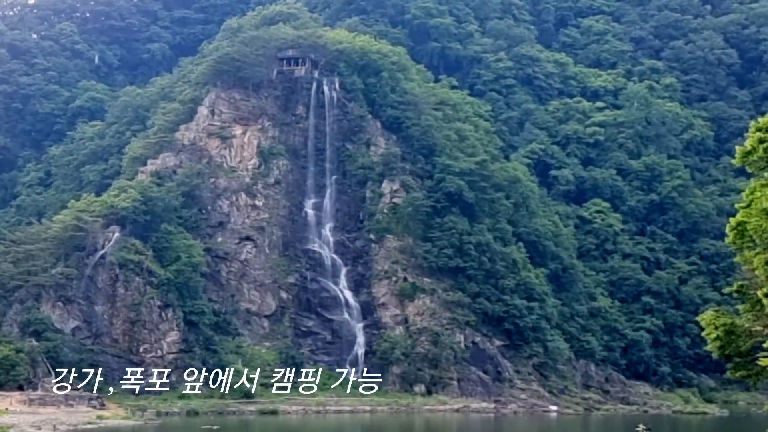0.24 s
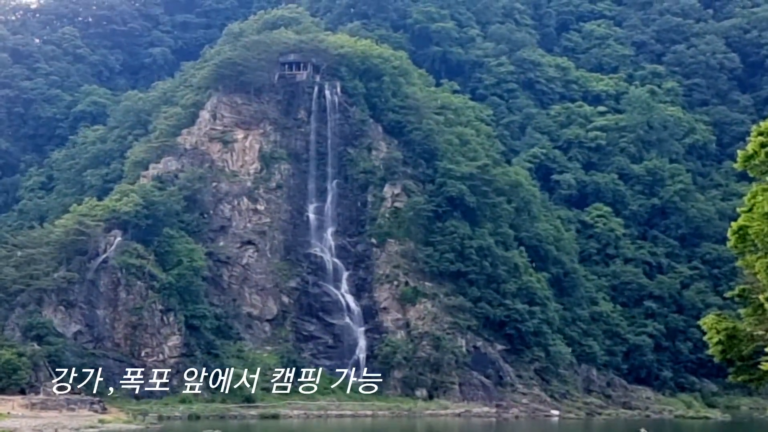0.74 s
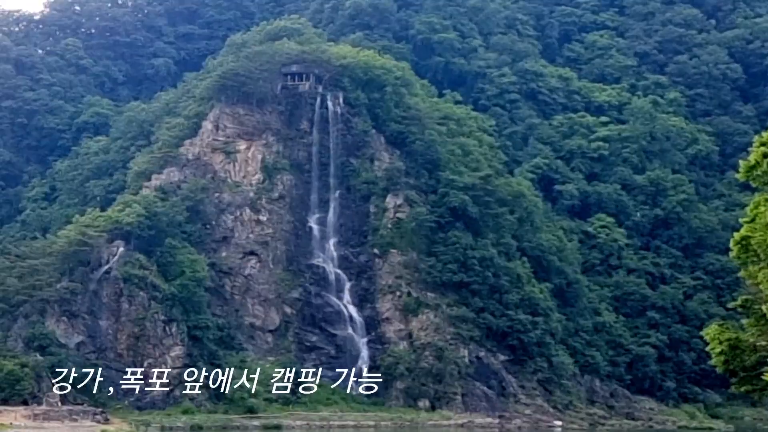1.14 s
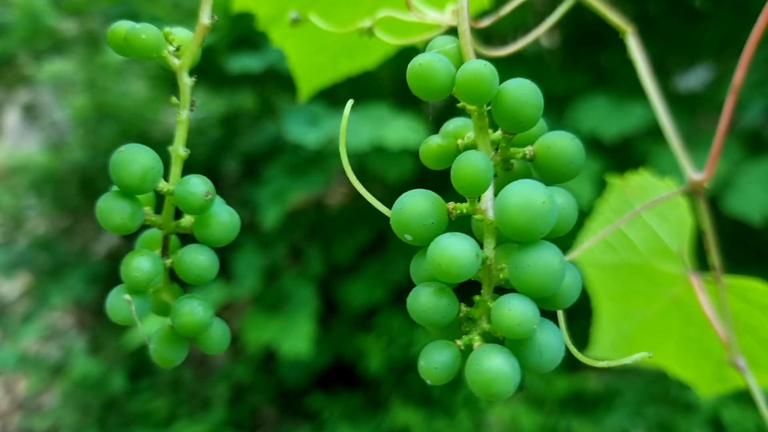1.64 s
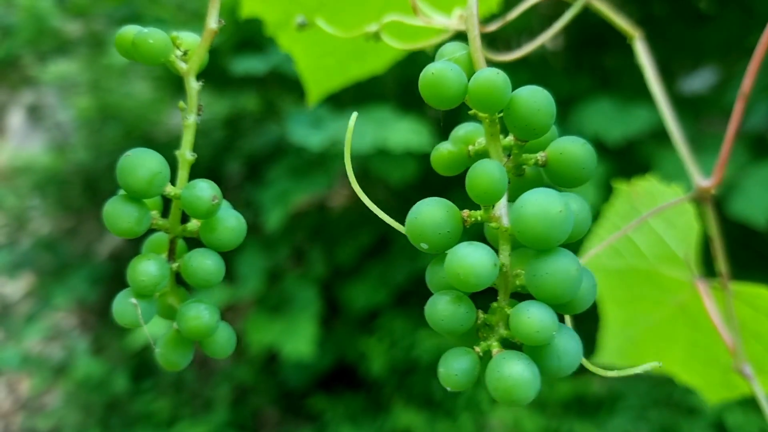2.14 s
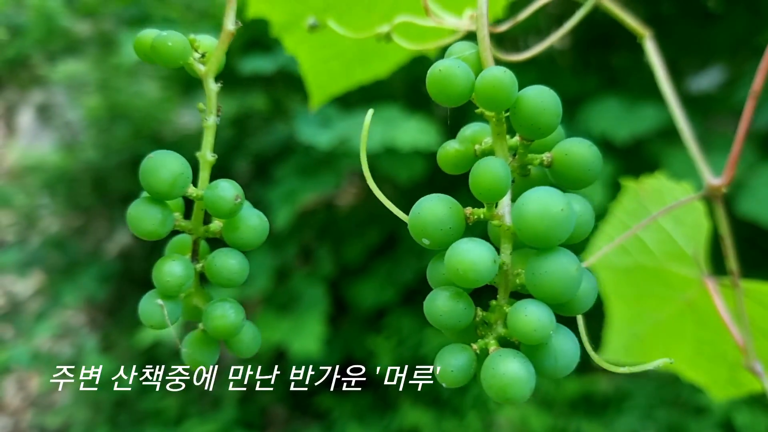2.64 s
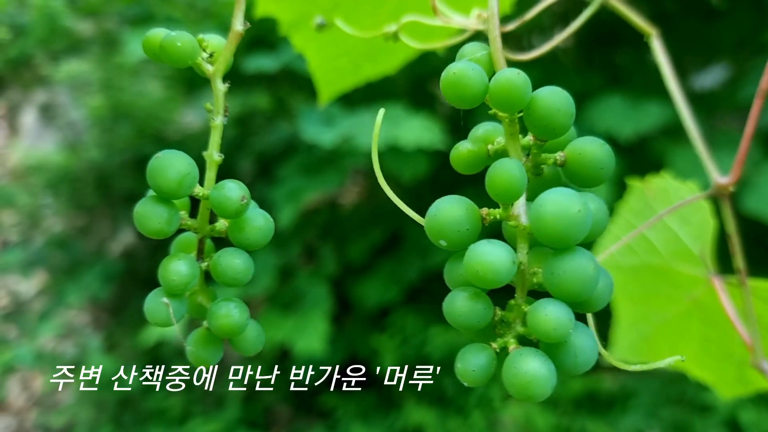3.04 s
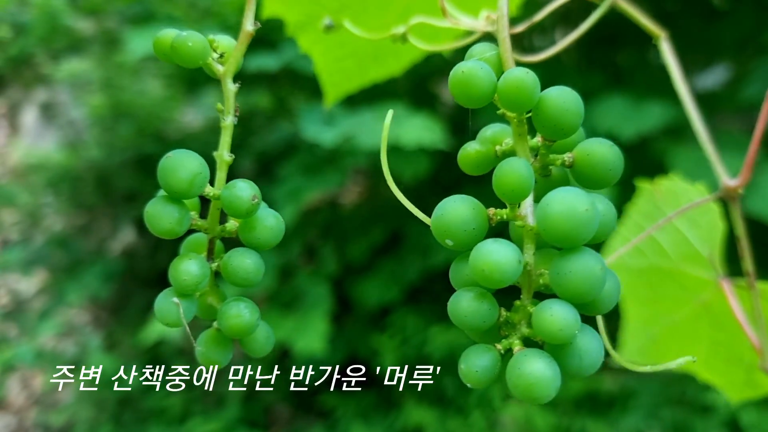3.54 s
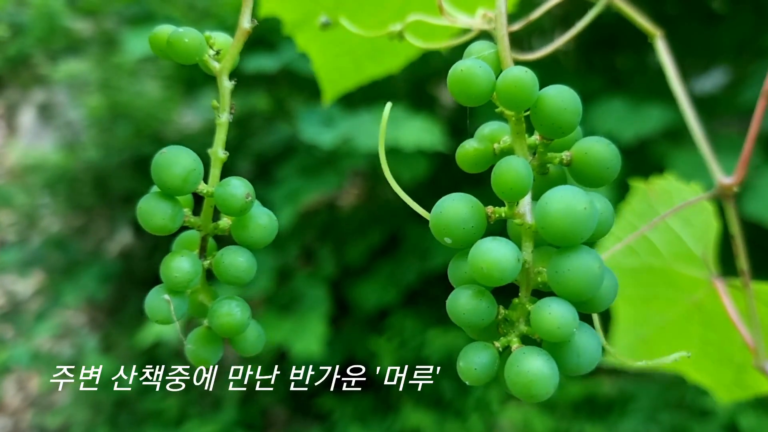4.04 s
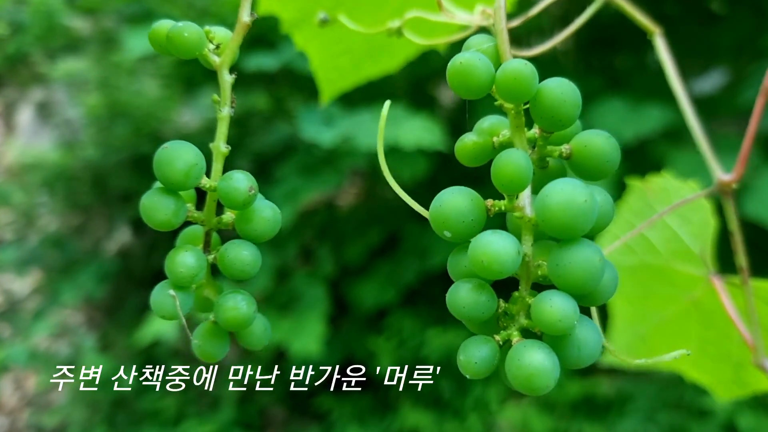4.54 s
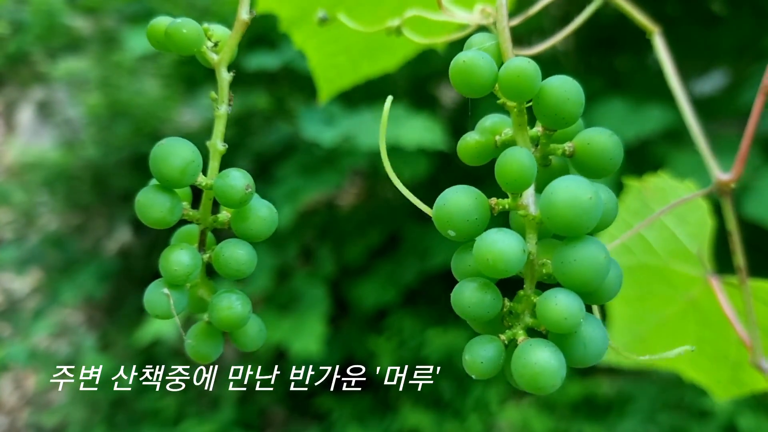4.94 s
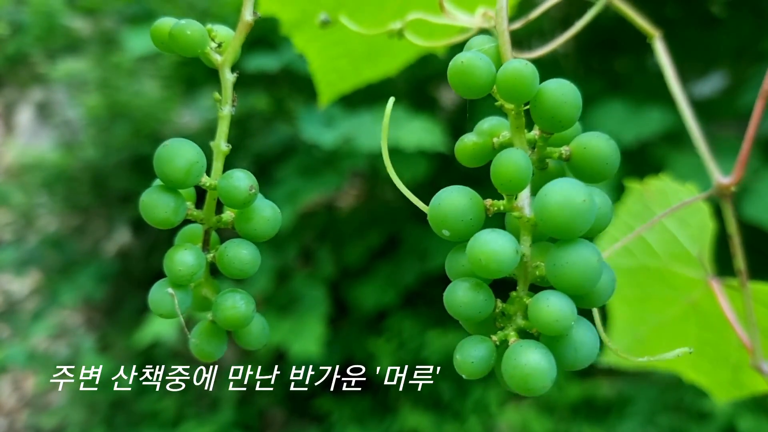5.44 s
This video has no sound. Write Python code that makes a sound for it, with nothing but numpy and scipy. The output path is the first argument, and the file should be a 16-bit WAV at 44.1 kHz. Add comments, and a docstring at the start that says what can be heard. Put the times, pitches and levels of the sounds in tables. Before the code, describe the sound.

From 0 to 1.45 s a distant waterfall rushes as a wide, dense, steady hiss and roar, with deep booms surging around 0.4 and 0.9 s. It stops abruptly, leaving about 0.03 s of near-silence. A quiet wood then opens with a fading blur of birdsong and faint far whistles. From 1.76 to 2.7 s a near songbird, right of centre, sings five fast phrases of arching, dipping, upward-flicking and falling whistles, with short added notes near 2.45 s. A low wind gust peaks at 2.7 s. A very faint falling-chip trill comes around 2.9-3.25 s, then sparse thin whistles, clearer around 4.1-4.3 s. Three nasal, slightly hoarse calls sound at 4.95-5.25 s. The near bird returns at 5.3-5.7 s. A soft, high insect rasp, tiny knocks, low air noise and short smeared tree echoes persist beneath.

```python
"""A near songbird, right of centre, repeats a four-part phrase of bending whistles in a quiet wood.
Before it a distant waterfall rushes (banded noise and pool booms) until a cut and a short near-silence.
A tit gives nasal two-voice calls, far birds whistle in short glides and trill in falling chips.
An insect chorus rasps near 4.4 kHz as narrow noise; small knocks ring and wind gusts reach the microphone.
The trees scatter every bird note into early echoes and a short, smeared noise tail."""
import sys
import numpy as np
from scipy import signal
from scipy.fft import rfft, irfft, next_fast_len
from scipy.io import wavfile
from scipy.ndimage import uniform_filter1d, map_coordinates

SR = 44100
rng = np.random.default_rng(int(sys.argv[2]) if len(sys.argv) > 2 else 0)


def file_out(sig):
    """Save sig as 16-bit WAV at sys.argv[1]."""
    # one column per channel
    cols = np.atleast_2d(sig).T
    # limit, then scale
    lim = np.clip(cols, -1, 1)
    pcm = np.round(lim * 32767).astype(np.int16)
    wavfile.write(sys.argv[1], SR, pcm)


N = 250488
T = np.arange(N) / SR

# the falls stop at the cut, stay faintly audible, and the wood opens
CUT_S, WOOD_S, SILENCE_DB = 1.4545, 1.4865, -38
CUTOFF_HZ = 15900  # where the top of the microphone channel is fully cut

# Far noise of the wood: traffic, leaves and microphone hiss (pitch_hz, relative_level_db per Hz)
AIR_SPECTRUM = [(18, -28.5), (30, -7), (80, -5), (130, -13), (200, -5), (340, -5), (420, -14), (900, -15.5),
                (1350, -24.5), (3200, -25.5), (5900, -28.5), (7600, -31.5), (9500, -41.5), (15500, -37)]
# Left-right likeness of that noise (pitch_hz, likeness -1 to 1)
AIR_LIKENESS = [(60, .77), (130, .53), (290, .23), (640, -.37), (1410, -.4), (3100, -.15), (6820, -.05),
                (15000, 0)]
# Its balance (pitch_hz, left_minus_right_db)
AIR_BALANCE = [(60, 3), (200, 1.5), (700, -.4), (2380, -2.5), (4400, -4), (8120, -.6)]
AIR_DB = -66.5
# Gusts of wind on the microphone (peak_s, level_db)
GUSTS = [(1.55, -68.5), (2.03, -70), (2.7, -61.5), (3.8, -70), (4.59, -74), (4.98, -78.5), (5.36, -87)]
GUST_RISE_DB_PER_S, GUST_FALL_DB_PER_S = 32.5, 44

# Insect chorus, joined up between rows (time_s, centre_hz, level_db)
INSECT_CHORUS = [(1.49, 4270, -61), (2.85, 4280, -67.5), (3.25, 4396, -69), (3.5, 4560, -70.5),
                 (3.75, 4340, -73), (4.15, 4640, -67), (4.42, 4210, -72), (4.6, 4170, -67),
                 (4.85, 4340, -70.5), (5.68, 4370, -67)]
# Small knocks in the undergrowth (start_s, pitch_hz, level_db, t60_s)
KNOCKS = [(2.384, 1780, -57, 0.007), (3.30, 491, -63.5, 0.12), (4.595, 1086, -66, .05),
          (4.852, 1360, -62, 0.023), (5.07, 468, -62.5, 0.19), (5.515, 300, -53.5, 0.084)]

# Distant rushing water (pitch_hz, relative_level_db per Hz)
FALLS_SPECTRUM = [(18, -31), (30, -57), (66, 3.5), (90, -4), (152, -14.5), (369, -9.5), (505, -19.5),
                  (808, -8), (1640, -18), (2420, -9), (2760, -11), (4090, -9.5), (7080, -18.5),
                  (11300, -37), (15500, -38.5)]
# Left-right likeness of the water (pitch_hz, likeness -1 to 1)
FALLS_LIKENESS = [(30, .4), (60, .58), (130, .87), (290, .85), (520, .72), (860, .85), (1400, .1),
                  (2300, .62), (2950, .15), (4200, .6), (5800, .5), (7300, .1), (9500, .48), (13000, .1)]
# Its balance (pitch_hz, left_minus_right_db)
FALLS_BALANCE = [(30, -2.5), (130, 0), (3000, 0), (4050, -6.5), (5300, -.5), (7100, 2), (8600, -4.5),
                 (10500, -1.2)]
RUSH_DB = -39
# Plunge-pool booms (pitch_hz, width_hz, relative_level_db)
POOL_BOOMS = [(52.7, 15.5, 1), (80.7, 23, -3), (97, 9.8, -8)]
# Surges of the pool, slow to build and fast to drop (peak_s, level_db)
SURGES = [(0.39, -45), (0.93, -43), (1.21, -55), (1.43, -50.5)]
SURGE_RISE_DB_PER_S, SURGE_FALL_DB_PER_S = 48, 132

# Resonances of the scattered song (pitch_hz, width_hz, relative_level_db)
BLUR_BANDS = [(4750, 500, 0), (6300, 1200, -10), (3500, 500, -18)]
BLUR_DB, BLUR_SAG_DB_PER_S = -46, 33  # level before the band filter, and its sag as the wood opens
BLUR_END_S, BLUR_FADE_DB_PER_S = 1.598, 145  # from here this fade adds to the sag
TREES_T60_S, TREES_DB, ECHO_DB = .55, -8.5, -5

# A far trill of quick falling chips; each gap is longer than the last by GAP_GROWS_S
TRILL_S, CHIP_GAP_S, GAP_GROWS_S, CHIPS = 2.896, .0232, .00036, 14
CHIP_HZ, CHIP_END_HZ, CHIP_S = 4750, 3950, .013
CHIP_DB, CHIP_SWELL_DB, CHIP_SCATTER_DB = -75, 1.05, 3  # first chip, rise per chip, random spread

# Far whistles (start_s, end_s, start_hz, end_hz, level_db, share hidden by leaves 0-1)
FAR_WHISTLES = [(1.55, 1.63, 2247, 2230, -66, .3), (1.604, 1.635, 3780, 3400, -59, .3),
                (1.615, 1.649, 2585, 2600, -64, .7), (1.668, 1.70, 2672, 2860, -60, .4),
                (1.70, 1.745, 3800, 4150, -55, .25), (1.742, 1.762, 4300, 4750, -56, .3),
                (1.80, 1.917, 2680, 1970, -62, .85), (2.09, 2.13, 2670, 2400, -61, .8),
                (2.13, 2.274, 2600, 1963, -61, .85), (2.785, 2.86, 7600, 8000, -78, .4),
                (2.955, 3.042, 7050, 7850, -78, .4), (3.14, 3.245, 6900, 7800, -78, .4),
                (3.227, 3.262, 4730, 5000, -71, .6), (3.335, 3.43, 6900, 7700, -79, .4),
                (3.41, 3.46, 4500, 5270, -76, .8), (3.548, 3.615, 4700, 5400, -76, .8),
                (4.088, 4.13, 8580, 8170, -64, .5), (4.112, 4.153, 5270, 5160, -72, .8),
                (4.12, 4.15, 7900, 7650, -57, .35), (4.158, 4.182, 6700, 6000, -54, .3),
                (4.235, 4.276, 7050, 7420, -65, .6), (4.257, 4.284, 6700, 3700, -54, .1),
                (4.282, 4.335, 2260, 2200, -69, .15), (4.445, 4.50, 7300, 7800, -78, .5),
                (4.505, 4.55, 3600, 4050, -65, .4), (4.61, 4.655, 7300, 7750, -78, .5),
                (4.658, 4.744, 3420, 3200, -68, .15), (4.742, 4.765, 2990, 2930, -68, .2),
                (4.79, 4.847, 7450, 7750, -78, .5), (4.825, 4.874, 5860, 5930, -74, .5),
                (4.888, 4.963, 2860, 4700, -69, .5), (5.636, 5.664, 3300, 3540, -62, .5)]
FAR_LAG_SPREAD_S = .00004  # far birds sit a little to either side

# Nasal calls, both halves of the voice box at once
# (start_s, hoarse_lead_s, clear_part_s, low_voice_hz, high_voice_hz, glide_pitch_share, level_db)
NASAL_CALLS = [(4.945, 0.0218, 0.027, 2863, 3463, 0.046, -55),
               (5.04, 0.029, 0.068, 3108, 3730, -0.016, -55), (5.166, .048, .082, 3130, 3802, -.025, -55.5)]
# Tones made as the two voices modulate each other (low_voice_multiple, high_voice_multiple)
VOICE_MIXES = [(1, 0), (0, 1), (2, 0), (1, 1), (0, 2), (-1, 3), (3, 0), (2, 1), (1, 2), (4, 0), (3, 1),
               (2, 2), (0, 3), (-1, 2), (3, -1)]
# Level of each of those tones against the call (level_db)
VOICE_MIX_DB = [-4.5, 1.5, 0.5, 0, -4.5, -11.5, -21, -26, -34, -30, -32.5, -34, -41, -25, -6]
LEAD_PITCH_SHARE, CALL_BOW = 1.05, .0113  # starting pitch factor; upward arch as a pitch share
LEAD_DB, CLEAR_EDGE_DB = -19, -7  # against the middle of the clear part
MID_HOARSE, END_HOARSE = .05, .22  # hoarse share 0-1

# One songbird phrase: arch, scoop, upward flick, falling end
# (start_s within phrase, length_s, start_hz, middle_hz, end_hz, relative_level_db, peak_share of length)
# start_s and length_s are stretched by the length factor of each phrase
PHRASE_PARTS = [(.002, .044, 4650, 5050, 4200, 0, .6), (.045, .022, 4050, 3760, 3950, 0, .5),
                (.065, .014, 3950, 4750, 6800, -4, .5), (.082, .024, 3650, 3270, 3080, -5, .4)]
# Each phrase (start_s, level_db, length_factor)
PHRASES = [(1.761, -39, .98), (1.918, -35.5, 0.95), (2.083, -37, 0.94), (2.250, -39.5, .99),
           (2.590, -38, 0.91)]
# Other syllables of the songbird
# (start_s, length_s, start_hz, middle_hz, end_hz, level_db, peak_share of length)
OTHER_SYLLABLES = [(2.427, .032, 3230, 2630, 2600, -57.5, .7), (2.459, 0.018, 2716, 3295, 3390, -36, 1),
                   (2.477, 0.017, 3530, 4000, 5730, -36, 0.19),
                   (2.497, 0.03, 3534, 2955, 2860, -45.5, 0.11),
                   (5.300, 0.03, 6050, 6380, 6890, -42.5, 0.9), (5.332, 0.033, 6840, 5300, 4240, -40, 0.62),
                   (5.430, .028, 3645, 4017, 3610, -32.5, 0.78), (5.459, .025, 3592, 3994, 3940, -35, 0.67),
                   (5.483, 0.048, 3945, 4333, 5310, -36, .8), (5.617, 0.046, 5880, 6380, 6930, -41.5, 1),
                   (5.660, .034, 6883, 5690, 4252, -39, 0.6)]
SINGER_LAG_S, SINGER_PAN_DB = .000372, -2.3  # to the right: left channel later and softer
SYLLABLE_START_DB, SYLLABLE_END_DB = 17, 10  # depth of start and end under the loudest point


def amp(db):
    """Gain of a level in dB."""
    return 10 ** (np.asarray(db) / 20)


def unit(x):
    """Scaled to rms 1."""
    return x / np.sqrt(np.mean(x ** 2) + 1e-20)


def columns(rows, t=T):
    """Each column of a curve table at times t."""
    s, *rest = np.transpose(rows)
    return [np.interp(t, s, c) for c in rest]


def at_hz(points, hz):
    """Spectrum value on a log-frequency axis."""
    f, v = np.transpose(points)
    return np.interp(np.log(hz), np.log(f), v)


def drift(rate, size=N):
    """Random wander with this many turns a second (at most 1500), spread about 1."""
    knots = rng.standard_normal(9000)
    position = 3 + np.arange(size) / SR * min(rate, 1500)
    return map_coordinates(knots, [position], order=1) * np.sqrt(1.5)


def swells(rows, rise_db_per_s, fall_db_per_s):
    """Gain that climbs to each peak and drops from it at steady rates."""
    gain = 0
    for s, db in rows:
        slope = np.where(T < s, rise_db_per_s, fall_db_per_s)
        gain = gain + amp(db - slope * abs(T - s))
    return gain


def resonate(x, hz, width):
    """Two-pole resonance of gain 1."""
    r = np.exp(-np.pi * width / SR)
    feedback = [1, -2 * r * np.cos(2 * np.pi * hz / SR), r * r]
    return signal.lfilter([(1 - r * r) / 2, 0, (r * r - 1) / 2], feedback, x)


def booms(modes):
    """Noise in a few steep resonances, partly separate in each channel."""
    common, own = rng.standard_normal(N), rng.standard_normal((2, N))
    noise, total = common + .72 * own, 0
    for hz, width, db in modes:
        ringing = resonate(resonate(noise, hz, width), hz, width)
        total = total + amp(db) * unit(ringing)
    return unit(total)


def wash(source, spectrum, alike, pan, shared_db, own_db):
    """Colours two unrelated noises into a stereo field whose half-octave bands swell together and alone."""
    size = source.shape[1]
    hz = np.maximum(np.fft.rfftfreq(size, 1 / SR), 1)
    likeness = np.clip(at_hz(alike, hz), -.99, .99)
    mid, side = rfft(source) * amp(at_hz(spectrum, hz)) * np.sqrt([1 + likeness, 1 - likeness])
    pair = np.array([mid + side, mid - side]) * amp(np.outer([.5, -.5], at_hz(pan, hz)))
    band = np.clip(2 * np.log2(hz / 30), 0, 18)
    out, shared = 0, drift(5, size)
    for k in range(19):
        own = drift(9, size) + drift(40, size)
        overlap = np.maximum(0, 1 - abs(band - k))
        out = out + amp(shared_db * shared + own_db * own) * irfft(pair * overlap, size)
    return out / np.sqrt(np.mean(out.mean(axis=0) ** 2))


def add(out, start_s, hz_of, gain_of_t, length_s, lag_s, pan_db):
    """Adds a gliding sine with soft ends to both channels, the left one late by lag_s."""
    first = int(start_s * SR) - 40
    t = np.arange(first, min(first + int(length_s * SR) + 80, N)) / SR
    turns = np.cumsum(hz_of(t)) / SR + rng.random()
    for side, sign in enumerate([.5, -.5]):
        late = t - sign * lag_s
        ends = np.clip(np.minimum(late - start_s, start_s + length_s - late) / .002, 0, 1)
        wave = np.sin(2 * np.pi * np.interp(late, t, turns))
        gain = np.sqrt(2) * amp(sign * pan_db) * gain_of_t(late)  # root 2 makes the level an rms
        out[side, first:first + len(t)] += gain * ends * wave


def roughen(x, share, rate):
    """Swaps a share of a tone's steady strength for signed flutter, which smears its line."""
    share = np.clip(share, 0, 1)
    return x * (np.sqrt(1 - share) + np.sqrt(share) * drift(rate))


def air():
    """Far noise of the wood as a wide wash, with low lumps of wind as resonant noise."""
    noise = rng.standard_normal((2, next_fast_len(N)))
    still = wash(noise, AIR_SPECTRUM, AIR_LIKENESS, AIR_BALANCE, shared_db=.3, own_db=.6)[:, :N]
    gusts = swells(GUSTS, GUST_RISE_DB_PER_S, GUST_FALL_DB_PER_S)
    wind = gusts * booms([(65, 49, 0)])
    return amp(AIR_DB) * still + wind * amp([[1.5], [-1.5]])


def trees(x):
    """Near branches give early echoes; moving leaves smear the dense dying tail of the wood."""
    t = T[:int(.6 * SR)]
    shape = (2, len(t))
    tail = rng.standard_normal(shape) * amp(-60 * t / TREES_T60_S) * np.clip(t / .028, 0, 1)
    strengths = rng.standard_normal(shape)
    sparse = rng.random(shape) < 1500 / SR  # about 1500 echoes a second
    early = strengths * sparse * np.exp(-t / .022) * (t > .001)
    out = 0
    for sent, reply, db in [(x, early, ECHO_DB), (roughen(x, .9, 800), tail, TREES_DB)]:
        reply = unit(reply) / np.sqrt(len(t))
        out = out + amp(db) * signal.fftconvolve(sent, reply, axes=1)[:, :N]
    return out


def waterfall():
    """Dense splashes merge into a distant rush, over resonant pool booms that surge."""
    size = next_fast_len(int(1.5 * SR))
    splashes = rng.standard_normal((2, size)) * amp(.46 * drift(250, size))
    rush = np.zeros((2, N))
    rush[:, :size] = wash(splashes, FALLS_SPECTRUM, FALLS_LIKENESS, FALLS_BALANCE,
                          shared_db=0, own_db=.68)
    surges = swells(SURGES, SURGE_RISE_DB_PER_S, SURGE_FALL_DB_PER_S)
    return amp(RUSH_DB) * rush + surges * booms(POOL_BOOMS) * amp([[-1.2], [1.2]])


def insects():
    """Slow noise carried on a wandering centre pitch makes a narrow grainy rasp."""
    hz, db = columns(INSECT_CHORUS)
    lowpass = signal.butter(3, 380, fs=SR, output="sos")
    noise = signal.sosfilt(lowpass, rng.standard_normal((2, 2, N)))
    turn = 2 * np.pi * np.cumsum(hz) / SR
    rasp = unit(noise[0] * np.cos(turn) + noise[1] * np.sin(turn))
    return amp(db + 2.3 * drift(35)) * rasp * amp([[-3], [3]])


def knocks():
    """Each knock sets one mode ringing, a sine that dies away exponentially."""
    out = np.zeros(N)
    for s, hz, db, t60 in KNOCKS:
        t = np.maximum(T - s, 0)
        out += amp(db - 60 * t / t60) * np.sin(2 * np.pi * hz * t)
    return out


def blurred_song():
    """Only the scattered sound of a finished song arrives: rough bands that fade, held to the song's range."""
    band = signal.butter(6, [3000, 7100], "band", fs=SR, output="sos")
    noise = signal.sosfilt(band, booms(BLUR_BANDS))
    sag = BLUR_SAG_DB_PER_S * (T - WOOD_S)
    fade = BLUR_FADE_DB_PER_S * np.maximum(T - BLUR_END_S, 0)
    return amp(BLUR_DB - sag - fade) * noise


def trill():
    """Each chip is a fast falling sine; the gaps lengthen and the chips tend to grow louder."""
    out = np.zeros((2, N))
    for k, chance in enumerate(rng.standard_normal(CHIPS)):
        s = TRILL_S + CHIP_GAP_S * k + GAP_GROWS_S * k * k / 2 - .003
        db = CHIP_DB + CHIP_SWELL_DB * k + CHIP_SCATTER_DB * chance
        add(out, s, lambda t: np.interp(t, [s, s + CHIP_S], [CHIP_HZ, CHIP_END_HZ]),
            lambda t: amp(db), CHIP_S, -.0002, -4)
    return out


def far_birds():
    """Straight glides under an arch; leaves break them up and hide part of the direct sound only."""
    out, hidden = np.zeros((2, N)), np.zeros(N)
    sides = rng.uniform(-1, 1, len(FAR_WHISTLES))
    for (s, end, hz, end_hz, db, share), side in zip(FAR_WHISTLES, sides):
        def arch(t):
            return amp(db) * np.sin(np.pi * np.clip((t - s) / (end - s), 0, 1)) ** .4
        add(out, s, lambda t: np.interp(t, [s, end], [hz, end_hz]), arch,
            end - s, side * FAR_LAG_SPREAD_S, -2.5)
        hidden = np.where((T >= s) & (T < end), share, hidden)
    hidden = uniform_filter1d(hidden, size=200)
    sent = roughen(out, hidden, 450)
    return (1 - hidden) * sent, sent


def tit():
    """Two voices and their mixing tones; each call slides down hoarsely, clears, glides and frays."""
    out, hoarse = np.zeros((2, N)), np.zeros(N)
    for start, lead, clear, low, high, glide, db in NASAL_CALLS:
        s = start + np.array([0, lead, lead + clear / 2, lead + clear])
        pitch = [LEAD_PITCH_SHARE, 1, 1 + glide / 2 + CALL_BOW, 1 + glide]
        level = db + np.array([LEAD_DB, CLEAR_EDGE_DB, 0, CLEAR_EDGE_DB])
        hoarse_times = [start, s[1] - .006, s[1] + .0053, s[2], s[3]]
        hoarse_shares = [1, 1, MID_HOARSE, MID_HOARSE, END_HOARSE]
        hoarse += np.interp(T, hoarse_times, hoarse_shares, left=0, right=0)
        for (m, n), mix_db in zip(VOICE_MIXES, VOICE_MIX_DB):
            add(out, start, lambda t: (m * low + n * high) * np.interp(t, s, pitch),
                lambda t: amp(mix_db + np.interp(t, s, level)), lead + clear, .0001, -1.5)
    return roughen(out, hoarse, 1100)


def songbird():
    """Near pure whistles: pitch bends smoothly through three points, loudness swells to one peak."""
    out, sung = np.zeros((2, N)), []
    for s, db, stretch in PHRASES:
        for part_s, length, *hz, part_db, peak in PHRASE_PARTS:
            sung.append((s + stretch * part_s, stretch * length, *hz, db + part_db, peak))
    for s, length, *hz, db, peak in sung + list(OTHER_SYLLABLES):
        bend = np.polyfit([0, length / 2, length], hz, 2)
        top = np.clip(peak, .1, .9) * length

        def loudness(t):
            depth = np.where(t - s < top, SYLLABLE_START_DB, SYLLABLE_END_DB)
            return amp(db - depth * np.interp(t - s, [0, top, length], [1, 0, 1]) ** 2)
        add(out, s, lambda t: np.polyval(bend, np.clip(t - s, 0, length)), loudness,
            length, SINGER_LAG_S, SINGER_PAN_DB)
    return roughen(out, .1, 170)  # breath pressure wavers within a note


def scene():
    """The falls until the cut, a hush, then the wood, whose far noise swells in."""
    clear = songbird() + tit() + trill()
    far, sent = far_birds()
    birds = clear + far + trees(clear + sent)
    swell = amp(-6 * np.exp(-np.maximum(T - WOOD_S, 0) / .075))
    wood = birds + insects() + blurred_song() + knocks() + swell * air()
    falls_on = np.maximum(np.clip((CUT_S - T) / .002, 0, 1), amp(SILENCE_DB) * (T < WOOD_S))
    wood_on = np.clip((T - WOOD_S) / .004, 0, 1)
    return waterfall() * falls_on + wood * wood_on


def record(dry):
    """A steep low-pass takes off the top, 60 dB down from the cutoff upward."""
    return signal.sosfilt(signal.cheby2(22, 60, CUTOFF_HZ, fs=SR, output="sos"), dry)


dry = scene()
out = record(dry)
file_out(out)
```